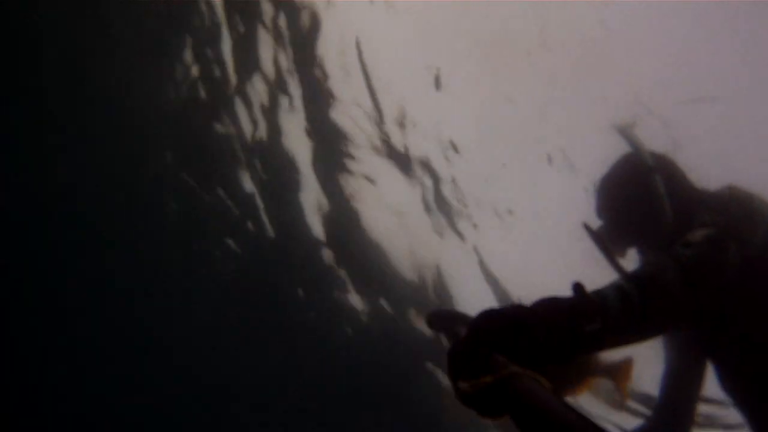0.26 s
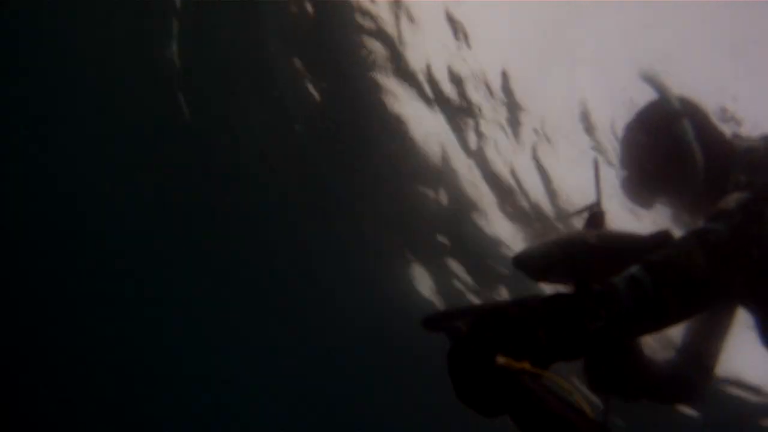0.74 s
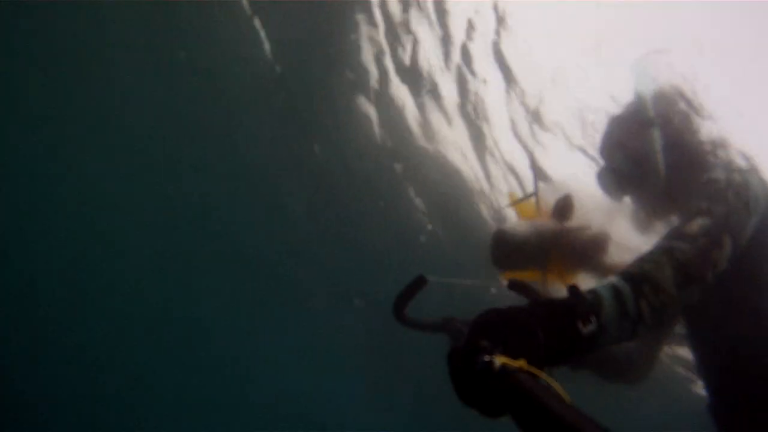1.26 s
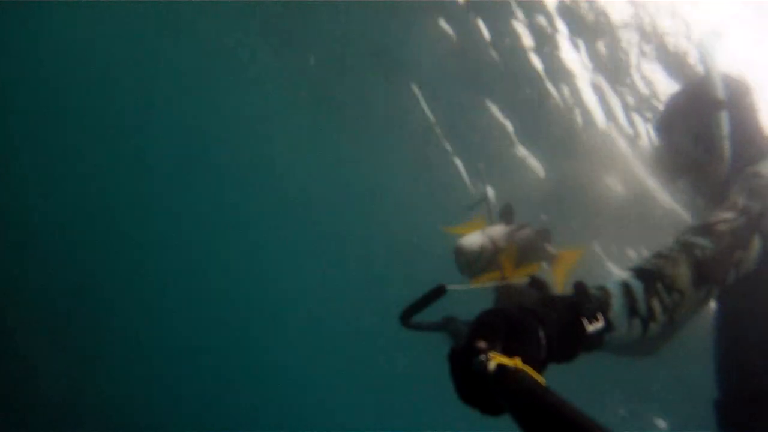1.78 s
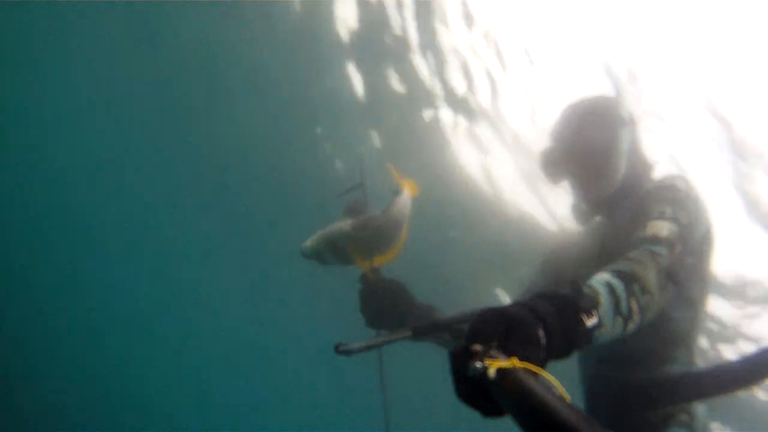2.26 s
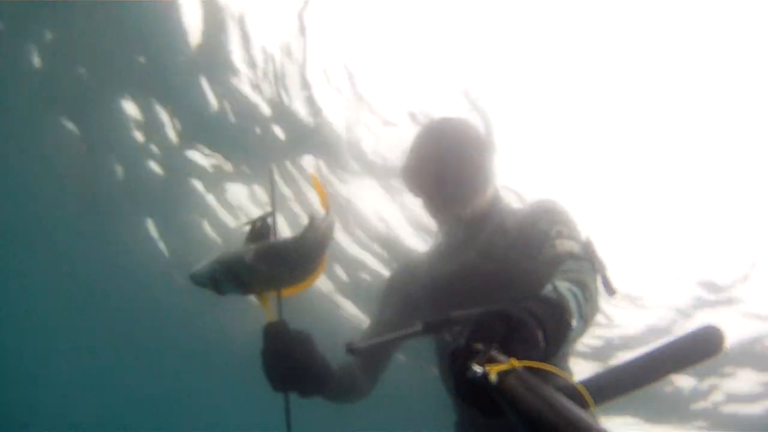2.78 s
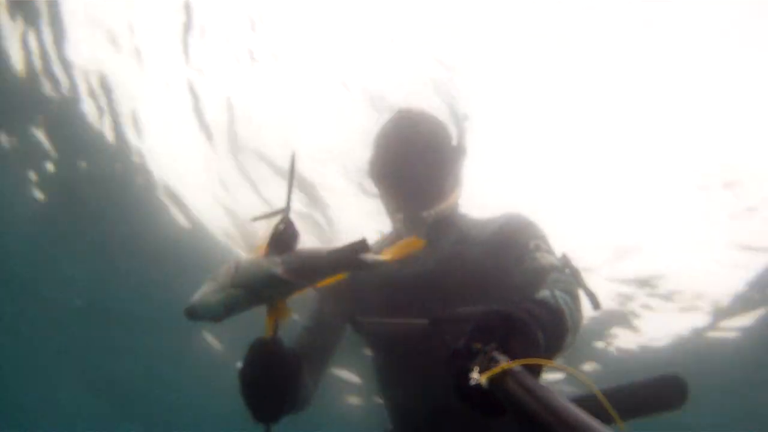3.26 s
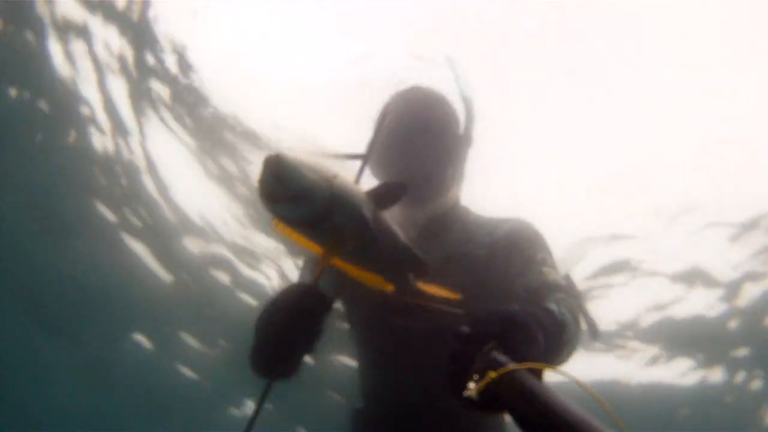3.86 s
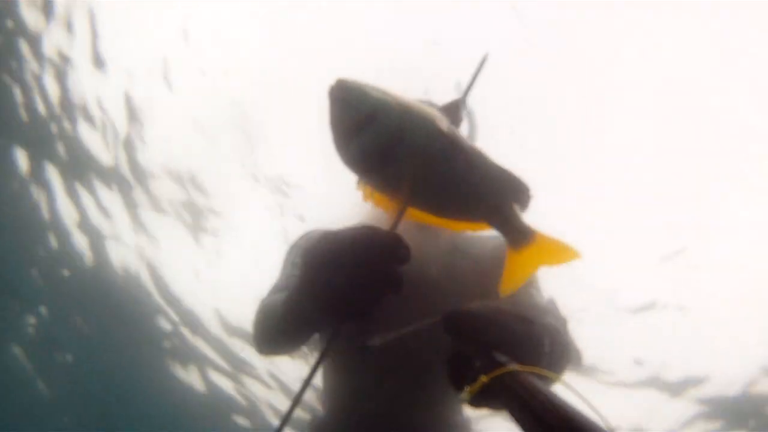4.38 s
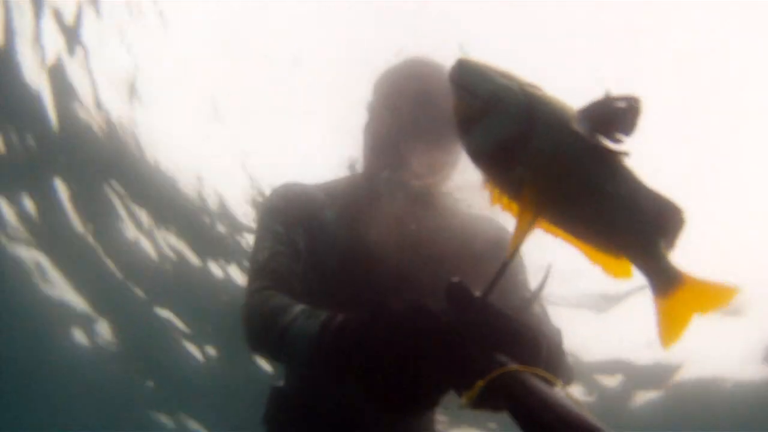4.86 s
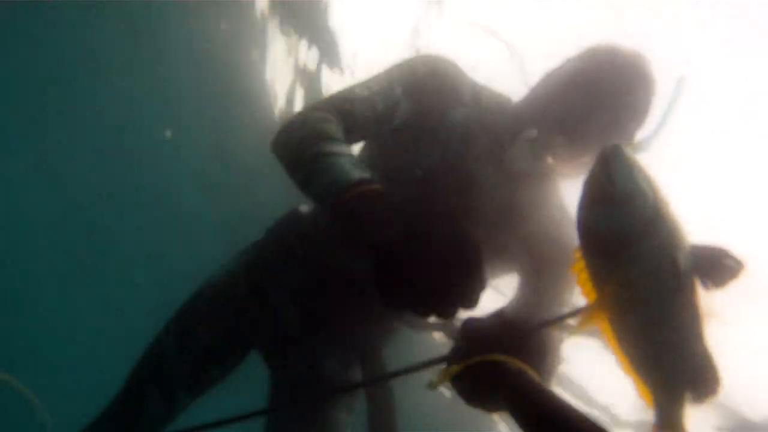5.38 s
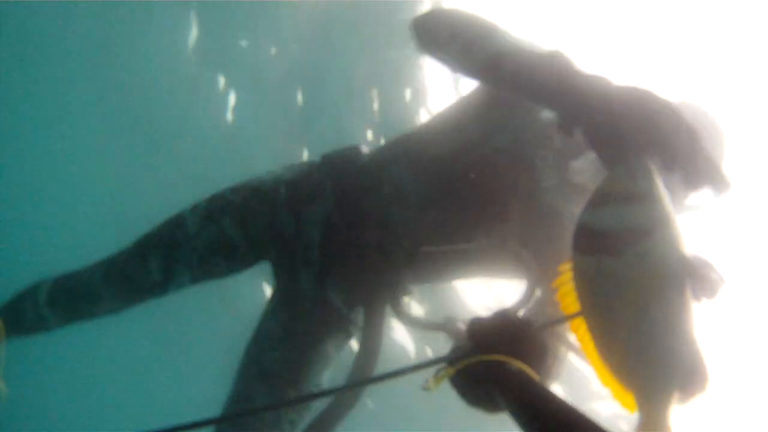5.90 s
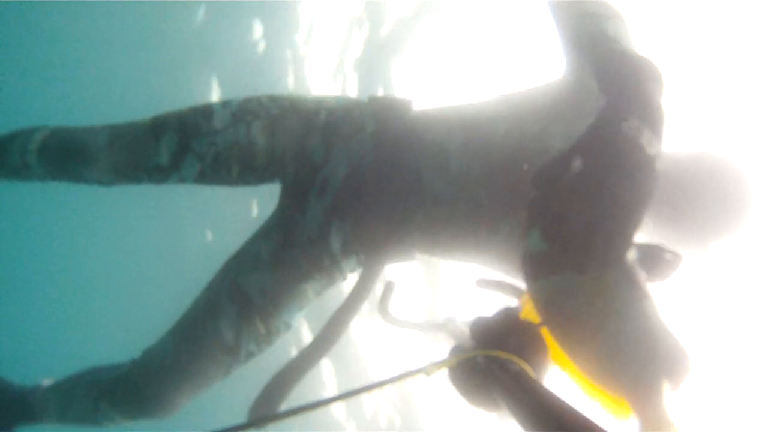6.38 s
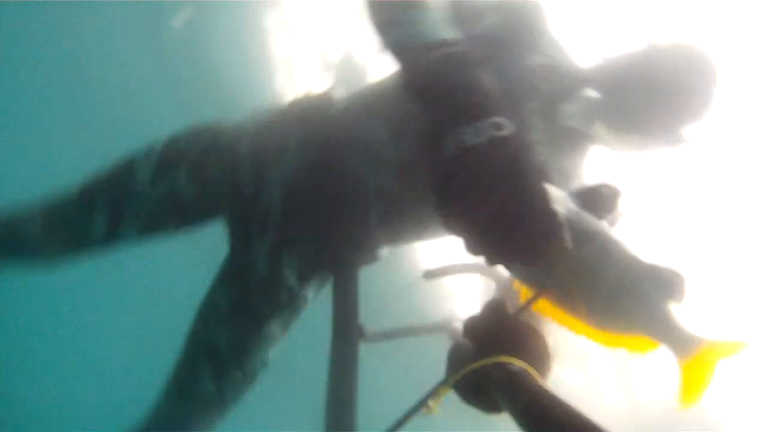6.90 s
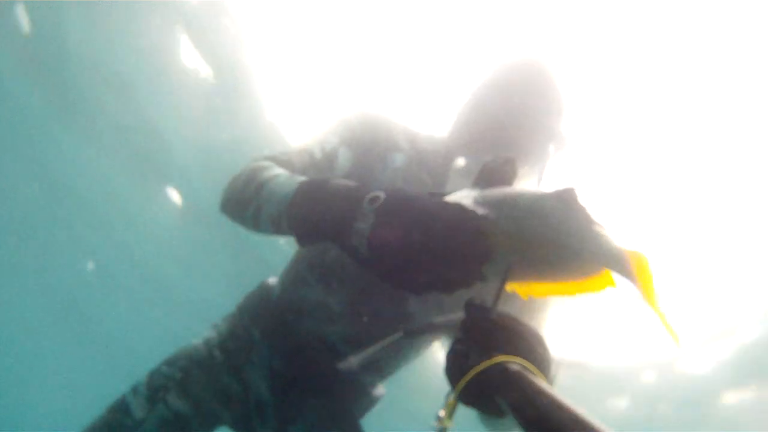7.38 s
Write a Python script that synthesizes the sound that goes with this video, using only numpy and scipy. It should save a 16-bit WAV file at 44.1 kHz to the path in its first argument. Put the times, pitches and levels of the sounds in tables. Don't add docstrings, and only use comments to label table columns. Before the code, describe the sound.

Underwater on a reef, heard from inside a sealed case fixed to a hollow tube. Sharp shrimp snaps tick irregularly throughout over a dense faint crackle and steady soft water noise. At the very start a short rising squeak and a falling one slip out as a line scrapes the tube until about 0.9 seconds. A low bubbly thump comes at 0.3, a flick at 0.57, then a ringing strike and deep bump around 0.83. From 1 to 3.3 it is mostly clicks, with a low surge at 2.3. Quick hollow knocks cluster from 3.4 to 3.75, with scraping; a deep shove follows near 4.15. The loudest clank lands at 5.2 with a burst of rubbing and humming. Clicks and small taps continue, dull rubbing at 6.1 and 6.75, sharp knocks at 7.1, low thuds from 7.2, and a final scrape and bump around 7.6. Close, boxy, with gritty treble.

```python
import sys
import numpy as np
from scipy import signal
from scipy.fft import rfft, irfft, next_fast_len
from scipy.io import wavfile
from scipy.ndimage import uniform_filter1d, map_coordinates

SR = 44100
rng = np.random.default_rng(int(sys.argv[2]) if len(sys.argv) > 2 else 0)


def voltage_ratio(decibels):
    exponent = np.asarray(decibels, float) / 20
    return 10 ** exponent


def to_wav(s):
    ch = np.atleast_2d(s).T
    pcm = np.round(np.clip(ch, -1, 1) * 32767)
    wavfile.write(sys.argv[1], SR, pcm.astype(np.int16))


N = 336924


def unit(x):
    return x / np.sqrt(np.mean(x ** 2) + 1e-20)


def curves(rows):
    s, *columns = np.transpose(rows)
    return [np.interp(np.arange(N) / SR, s, column) for column in columns]


def wobble(rate):
    points = rng.standard_normal(int(N * rate / SR) + 4)
    return map_coordinates(points, [np.arange(N) * rate / SR])


def smooth(slow):
    return np.interp(np.arange(N) / SR, np.arange(len(slow)) / 1000, slow)


def filtered(x, response):
    size = next_fast_len(N + SR // 2)
    hz = np.fft.rfftfreq(size, 1 / SR)
    return irfft(rfft(x, size) * response(hz), size)[..., :N]


def resonances(modes):
    def response(f):
        total = 0
        for k, (hz, width, db) in enumerate(modes):
            mode = 1j * f * width / (hz * hz - f * f + 1j * f * width)
            total = total + (-1) ** k * voltage_ratio(db) * mode
        return total
    return response


def noise(points):
    hz, db = np.transpose(points)

    def spectrum(f):
        return voltage_ratio(np.interp(np.log(f + 1), np.log(hz), db, -120, -120))
    return unit(filtered(rng.standard_normal(N), spectrum))


def scatter(times, rows):
    at = np.round(np.asarray(times) * SR).astype(int)[:, None] + np.arange(rows.shape[1])
    return np.bincount(at.ravel(), rows.ravel(), N + SR)[:N]


# (frequency [Hz], width [Hz], level [dB])
DULL = [(600, 103, 0.5), (1204, 343, 3), (1837, 315, 6.5)]
MIDDLE = [(2330, 278, 8.6), (2686, 303, 7), (3347, 124, 0.25)]
BRIGHT = [(4063, 1080, 5), (5310, 200, -12.5)]


def snaps(times, db, dull_db, bright_db, burst_s, tail_s, tail_db, direct):
    t = np.arange(SR // 40) / SR
    length = burst_s * np.exp(0.35 * rng.standard_normal((len(times), 1)))
    chance = rng.standard_normal((2, len(times), len(t)))
    early = np.exp(-(1.23 * t / length) ** 1.28) * chance[0] ** 3 / 4
    tail = voltage_ratio(tail_db - 60 * t / tail_s) * chance[1]
    echoes = early + tail
    echoes /= np.linalg.norm(echoes, axis=1, keepdims=True)
    burst = echoes - direct * (t == 0)
    ring = 0
    for wall, level in [(DULL, db + dull_db), (MIDDLE, db), (BRIGHT, db + bright_db)]:
        ring = ring + filtered(scatter(times, voltage_ratio(level)[:, None] * burst), resonances(wall))
    crack = scatter(times, direct * voltage_ratio(db - 0.5 + dull_db / 3)[:, None])
    through = resonances([(2280, 2340, 0)])
    return ring + filtered(crack, lambda f: through(f) ** 2)


# (time [s], peak level [dB], dull part [dB], bright part [dB])
SNAPS = [(0.0049, -22.5, -7, -7.5), (0.225, -19.5, -33, -16), (0.379, -25.5, -1, -1.5),
         (0.5733, -26, 2, -15), (1.025, -23, -1, 5), (1.3116, -19, -3, -4), (1.7504, -24.5, -16, -0.5),
         (1.879, -17, -2.5, -1), (2.3324, -22, 3.5, -7.5), (2.6587, -25, -5.5, -6.5),
         (2.7733, -24, -4.5, -2.5), (3.4024, -20.5, -5, -8), (3.4425, -22, -8, -11),
         (3.748, -19.5, -4.5, -6), (4.0385, -26.5, 4.5, -3.5), (4.212, -22.5, -30, -8),
         (4.2308, -24, 5.5, -5), (4.3675, -34.5, 10, 6.5), (4.8609, -23, -38, -1), (4.933, -25, -14, -24),
         (5.1115, -22, 1.5, -1), (5.2908, -22, 4, -1), (5.4625, -18.5, -6.5, -14), (5.7779, -29.5, 7.5, -4),
         (6.1953, -28.5, 9.5, 2), (6.5317, -26.5, -1, -17), (6.643, -24.5, 1, -12.5), (7.0034, -22, -2, -1),
         (7.0849, -43, 20, 4), (7.3271, -39, 12.5, 5)]
# (time [s], peak level [dB])
THIN = [(0.2634, -30), (0.314, -25), (0.3504, -28.5), (.617, -31.5), (0.97, -30), (1.1563, -34),
        (1.7104, -27.5), (2.0112, -29), (2.094, -29), (2.236, -29.5), (2.5174, -30.5), (2.527, -31),
        (2.7234, -27.5), (2.8975, -30.5), (2.929, -31), (3.269, -32.5), (3.68, -27.5), (3.7144, -26.5),
        (3.8233, -25.5), (4.077, -28.5), (5.263, -30), (5.562, -27), (6.03, -28.5), (6.0753, -27.5),
        (6.1762, -29), (6.499, -30.5), (6.7058, -29), (7.1893, -25), (7.217, -29.5), (7.2841, -29)]
# (time [s], peak level [dB])
FULL = [(.064, -30), (0.4352, -27.5), (1.731, -26), (1.7924, -25), (1.84, -30.5), (1.903, -31),
        (2.1873, -34), (3.318, -31.5), (3.52, -29.5), (3.5292, -28.5), (3.942, -30.5), (4.526, -26.5),
        (4.7027, -30), (4.7915, -27), (4.9752, -31), (5.2165, -26), (5.14, -31.5), (5.1926, -27),
        (5.3143, -28), (5.4731, -30.5), (5.856, -28.5), (5.8785, -31.5), (6.349, -25), (6.4609, -23.5),
        (6.5192, -26), (6.6086, -28), (6.936, -25), (7.066, -31), (7.137, -31), (7.301, -30.5)]
# (time [s], peak level [dB])
FAINT = [(0.4092, -34), (0.73, -38), (0.868, -30.5), (1.0013, -33), (1.0684, -33), (1.2079, -32.5),
         (1.2728, -37), (1.609, -33), (1.637, -32), (1.7723, -32), (1.914, -38), (2.196, -30.5), (2.4, -40),
         (2.948, -35.5), (3.1927, -32), (3.254, -32.5), (4.3037, -29), (4.3347, -35.5), (4.448, -34),
         (4.501, -32.5), (4.628, -41), (5.06, -32.5), (5.184, -32), (5.4044, -36), (5.6657, -40),
         (5.838, -33), (5.937, -32), (1.897, -37), (6.69, -35), (7.52, -39)]


def shrimp():
    thin = [(s, db, -9, -2) for s, db in THIN]
    full = [(s, db, -4.5, -3) for s, db in FULL]
    s, db, dull_db, bright_db = np.transpose(SNAPS + thin + full)
    near = snaps(s + 0.00042, db + 18.5, dull_db, bright_db + 0.5,
                 burst_s=0.0019, tail_s=0.043, tail_db=-14, direct=0.93)

    strays, stray_db = 70, -43
    stray = rng.random((strays, 2)) * [N / SR, 6] + [0, stray_db - 7.5]
    s, db = np.transpose(FAINT + list(stray))
    colour = rng.standard_normal((len(s), 2))
    faint = snaps(s + 0.00039, db + 21.0, -6 + 3 * colour[:, 0], -3 + 3 * colour[:, 1],
                  burst_s=0.0011, tail_s=0.062, tail_db=-14.5, direct=0.63)

    far_count, reef_db = 1300, -50
    draw = rng.random((far_count, 2))
    colour = rng.standard_normal((far_count, 2))
    size_db = np.minimum(-4.2 * np.log(draw[:, 1]), 8)
    far = snaps(draw[:, 0] * N / SR, size_db, -7 + 6 * colour[:, 0], -4 + 6 * colour[:, 1],
                burst_s=0.002, tail_s=0.05, tail_db=-20, direct=0.7)
    return near + faint + voltage_ratio(reef_db) * unit(far)


# (start time [s], length [s], level [dB], brightness [dB])
STROKES = [(0, 0.68, -61.5, 0), (0.628, 0.35, -58.5, -2), (3.394, 0.23, -59, 3), (3.898, 0.38, -57, -6),
           (5.06, 0.19, -54, -17), (5.233, 0.13, -41.5, -9), (5.35, 0.34, -60, -20),
           (5.913, 0.14, -60.5, -1), (6.055, 0.26, -53.5, -16), (6.704, 0.276, -55, -30),
           (6.757, 0.2, -48.5, -24), (7.399, 0.14, -45, -1), (7.45, 0.13, -46, -12),
           (7.579, 0.05, -41, -25)]


def rubbing():
    edge_s, resting_db = 0.031, -60
    s, length, level_db, bright_db = np.transpose(STROKES)[:, :, None]
    t = np.arange(8000) / 1000 - s
    shape = np.clip(np.minimum(t, length - t) / edge_s + 0.5, 0, 1) ** 2
    grit = rng.standard_normal((2, N)) * voltage_ratio(2.2 * wobble(70))
    wander = uniform_filter1d(grit, size=900, axis=1)
    wander = uniform_filter1d(wander, size=900, axis=1)
    grip = voltage_ratio(2.1 * unit(wander))
    grit = grit * grip[::-1]
    # (Hz, width Hz, dB)
    low_modes = [(446, 71, -3.5), (594.6, 45.0, 1.0), (669, 112, -9.0), (900, 168, -6.0)]
    high_modes = [(1290, 230, -8.5), (1450, 60, -26.0), (1690, 120, -5.5), (2050, 330, 0.0)]
    low = unit(filtered(grit[0], resonances(low_modes)))
    high = unit(filtered(grit[1], resonances(high_modes)))
    stroke = voltage_ratio(level_db) * shape
    low_gain = voltage_ratio(resting_db) + smooth(stroke.sum(axis=0))
    high_gain = voltage_ratio(resting_db - 14) + smooth(np.sum(stroke * voltage_ratio(bright_db), axis=0))
    return low_gain * low + high_gain * high


def shoved(calm_db, crest_s, crest_db, fall_db_s):
    rise_db_s = 334
    t = np.arange(8000) / 1000 - crest_s[:, None]
    slope_db = np.minimum(rise_db_s * t, -fall_db_s * t)
    return voltage_ratio(calm_db) + smooth(voltage_ratio(crest_db[:, None] + slope_db).sum(axis=0))


# (frequency [Hz], level [dB per Hz])
HEAVE = [(12, -35), (26, 7.5), (34, -6.5), (43, -12), (54, 3.5), (70, -44)]
SLOSH = [(40, -68), (58, -33), (75, 6.5), (105, -8), (135, -9.5), (170, -47)]
GURGLE = [(100, -58), (150, -5), (240, -5), (350, -7), (450, -22.5)]
SEA = [(59, -59), (100, 4), (414, -13), (584, -33), (693, -19), (1080, -23.5), (1720, -10.5), (2070, -14),
       (2380, -5.5), (3530, -14.5), (4190, -11), (5140, -15), (6000, -14.5), (7800, -65), (13200, -120)]
# (time [s], effort [dB])
EFFORT = [(0, -35), (.21, -34), (.4, -39), (.76, -33.5), (1.04, -39.5), (1.34, -49), (2.23, -48.5),
          (2.6, -54.5), (3.19, -50), (3.49, -56.5), (4.1, -50), (5.15, -52.5), (6.02, -45), (6.38, -59),
          (6.94, -42), (7.15, -44.5), (7.3, -39), (7.64, -50)]
# (time of crest [s], heave [dB], slosh [dB], gulp [dB])
SHOVES = [(.2, -58, -37, -50), (.3, -33.5, -41, -42), (.54, -57, -44, -53), (0.851, -25, -26.5, -51),
          (1.04, -40, -50, -60), (2.05, -56, -53, -60), (2.339, -35, -46, -58.5), (3.4, -68, -68, -53),
          (3.54, -68, -72, -49), (3.64, -44, -44.5, -68), (3.82, -59, -55, -75), (4.15, -27, -40.5, -57),
          (4.5, -48, -53.5, -69), (5.25, -31.5, -33.5, -50), (6.3, -74, -43, -62), (6.55, -42, -42.5, -55),
          (6.64, -66, -62, -78), (6.85, -47, -51, -52.5), (7.248, -33.5, -33.5, -48), (7.36, -40, -40, -64),
          (7.6, -35, -40, -44.5)]


def water():
    effort_db, = curves(EFFORT)
    crest_s, heave_db, slosh_db, gulp_db = np.transpose(SHOVES)
    lump = np.tanh(wobble(14))
    heave = shoved(effort_db, crest_s, heave_db, fall_db_s=90)
    heave = heave * voltage_ratio(3 * lump) * noise(HEAVE)
    slosh = shoved(effort_db - 11.5, crest_s, slosh_db, fall_db_s=130)
    slosh = slosh * voltage_ratio(3.5 * lump) * noise(SLOSH)
    calm_db = -63 + 0.075 * (effort_db - effort_db.mean())
    gurgle = shoved(calm_db, crest_s, gulp_db, fall_db_s=152)
    gurgle = gurgle * voltage_ratio(2.4 * lump + 2.9 * wobble(25)) * noise(GURGLE)
    sea = voltage_ratio(-53.0 + 2.35 * wobble(30)) * noise(SEA)
    return heave + slosh + gurgle + sea


# (time [s], peak level [dB], pitch [Hz], swell time [s])
TONES = [(.0045, -36, 1560, 0.00081), (.005, -30, 3310, 0.00091), (.573, -32.5, 1560, 0.001),
         (1.025, -41, 600, 0.0027), (3.4029, -17, 1630, 0.00054), (3.4029, -31, 3120, .0012),
         (3.4808, -33.5, 1280, 0.0023), (3.497, -41, 374, .005), (3.514, -36, 297, 0.0055),
         (3.5706, -37, 253, 0.0039), (3.571, -24.5, 450, 0.0028), (3.667, -35, 1840, 0.0018),
         (3.687, -20, 933, 0.0017), (3.6905, -22, 556, 0.0022), (3.7045, -22.5, 900, 0.0014),
         (3.7, -39, 700, .0012), (3.732, -43, 704, .0015), (3.736, -43, 450, .003),
         (3.719, -32, 850, 0.002), (4.0375, -26, 1690, 0.0011), (4.0487, -38, 4100, .001),
         (4.231, -22.5, 1950, 0.0008), (4.232, -29, 3000, 0.002), (4.231, -30.5, 3950, 0.0011),
         (4.232, -35, 1030, 0.0012), (.818, -37.5, 1690, 0.0036), (4.933, -34.5, 1000, 0.0016),
         (5.1115, -26, 2620, 0.00094), (5.1116, -30, 1720, 0.00091), (5.111, -36, 1060, 0.00064),
         (5.113, -28, 3250, 0.0013), (5.1213, -31, 4040, 0.00078), (5.216, -27, 3280, 0.0014),
         (5.215, -21.5, 2780, .0008), (5.2153, -18, 900, 0.0012), (5.221, -34, 2610, 0.003),
         (5.4621, -16.5, 1860, 0.00086), (5.215, -16, 1460, 0.0018), (5.216, -31, 2170, .0016),
         (5.7781, -18.5, 2350, 0.0011), (5.783, -29, 1970, 0.0012), (5.776, -41, 1000, 0.0031),
         (5.462, -33.5, 900, 0.0015), (6.1955, -14.5, 1780, 0.00077), (6.1953, -21.5, 2840, 0.001),
         (7.326, -40, 1000, 0.0012),
         (.28, -32, 253, 0.0063), (0.28, -29.5, 177, 0.0071), (.52, -39, 226, 0.008),
           (5.24, -34.5, 553, .028), (2.303, -33.5, 144, 0.0026), (5.225, -39, 194.4, 0.0313),
           (5.275, -41, 1290, 0.02), (5.27, -42.5, 1470, 0.021), (5.27, -44, 890, 0.025),
           (6.7, -32, 105, .008), (.052, -43, 650, 0.0024)]


def panels():
    t = np.arange(SR // 5) / SR
    s, db, hz, swell_s = np.transpose(TONES)[:, :, None]
    u = t / swell_s
    return scatter(s[:, 0], voltage_ratio(db) * u * np.exp(1 - u) * np.sin(2 * np.pi * hz * t))


# (time [s], pitch [Hz], level [dB])
SQUEAKS = [
    [(.006, 2460, -45), (.011, 2480, -33), (.02, 2540, -35), (.027, 2650, -34), (.031, 2650, -74)],
    [(.03, 2150, -37), (.033, 2030, -35), (.038, 1850, -40), (.045, 1650, -29.5), (.05, 1350, -34),
     (.055, 1290, -32), (.06, 1410, -38.5)],
]


def squeaks():
    out = np.zeros(N)
    for rows in SQUEAKS:
        hz, db = curves(rows)
        phase = 2 * np.pi * np.cumsum(hz * (1 + 0.02 * wobble(408))) / SR
        sounding = (db > db[-1]) * (np.arange(N) > rows[0][0] * SR)
        overtone = voltage_ratio(-9) * np.clip(hz / 500 - 2.4, 0, 1) * (hz < 1850)
        tone = np.sin(phase) + overtone * np.sin(2 * phase)
        out += voltage_ratio(db + 3.5 * wobble(350)) * sounding * tone
    return out


# (time [s], level [dB])
MUFFLED = [(0.2627, -45), (0.2731, -40), (0.2981, -44), (0.4207, -39), (0.4357, -44), (0.5403, -44),
           (0.617, -38.5), (0.711, -49), (0.7797, -53), (0.8063, -54), (1.1, -44), (1.2007, -38),
           (1.2071, -44), (1.2725, -47), (1.5828, -45.0), (1.6476, -36), (1.9344, -38.5), (2.3157, -44.0),
           (2.4003, -42.5), (2.517, -46), (2.9476, -40), (3.0623, -41), (3.129, -43), (3.2708, -39.5),
           (3.4425, -38), (3.575, -41), (3.6671, -38), (3.7725, -42), (3.9273, -41), (3.9678, -46),
           (4.086, -43), (4.1335, -36), (4.1491, -48), (4.2875, -45), (4.6283, -37), (4.7029, -37),
           (4.9522, -42), (4.9731, -38), (5.0595, -38.5), (5.1566, -37.5), (5.4972, -42), (5.551, -35),
           (5.6559, -46), (5.895, -49), (5.9018, -43.5), (6.03, -46), (6.1328, -46), (6.2218, -46.0),
           (6.2537, -42), (6.3981, -41), (6.5628, -47), (6.783, -46.5), (6.8472, -39), (7.065, -37),
           (7.132, -41), (7.237, -44), (7.3048, -42), (7.3437, -43.0), (7.411, -43), (7.6167, -52)]
# (time [s], level [dB])
CRISP = [(0.3299, -37), (0.7108, -37), (0.7308, -38.5), (0.781, -34), (0.8053, -38), (1.046, -31.5),
         (1.2726, -40), (1.3265, -41), (1.479, -37), (1.4985, -41), (1.542, -39.5), (1.5682, -37.5),
         (1.827, -36.5), (1.922, -40), (2.0336, -34.5), (2.084, -37), (2.261, -37), (2.3075, -47),
         (2.3573, -39), (2.5008, -38), (2.5386, -35), (2.602, -37), (2.8974, -44), (3.0602, -46),
         (3.16, -34.5), (3.2048, -34.5), (3.3683, -35.5), (3.5913, -38), (3.919, -38.5), (4.086, -36),
         (4.1476, -38), (4.3357, -41), (4.4869, -40), (4.643, -44), (4.7476, -37.5), (4.803, -38),
         (4.9527, -47), (5.033, -38), (5.0694, -42.0), (5.1214, -37), (5.2529, -38), (0.032, -29),
         (5.514, -37.5), (5.6661, -40.5), (5.794, -36.5), (5.8904, -34.5), (5.909, -36.5), (6.1224, -37),
         (6.1406, -36.5), (6.2612, -40), (6.674, -42), (3.6885, -40), (7.0, -33), (7.2308, -38),
         (7.246, -37), (7.356, -36.5), (7.4143, -39.5), (7.5275, -37)]


def distant():
    s, db = np.transpose(MUFFLED)
    muffled = snaps(s, db + 19, 8.3, -2.8, burst_s=0.002, tail_s=0.048, tail_db=-17, direct=0.33)
    s, db = np.transpose(CRISP)
    crisp = snaps(s, db + 22.0, -8.5, -1.4, burst_s=0.0017, tail_s=0.056, tail_db=-13.5, direct=0.84)
    return muffled + crisp


# (frequency [Hz], level [dB], time to fade by 60 dB [s])
BARREL = [(225, -25, .08), (360, -8, .085), (465, -18, .06), (551, 0, .11), (640, -13, .25), (706, -8, .2),
          (870, -11, .11), (983, -2, .05), (1265, -16, .07), (1484, -11, .07), (1675, -16, .07),
          (2110, -12, .03), (2600, -14, .035), (3240, -15, .025)]
# (time [s], peak level [dB], brightest pitch [Hz], share of full ring time)
FLICKS = [
    (.062, -37, 720, 0.19),
    (.572, -26.5, 695, 0.17),
    (2.195, -40, 1050, 0.49),
    (4.589, -36, 1090, 0.3),
]
# (time [s], peak level [dB], brightest pitch [Hz], share of full ring time)
STRIKES = [
    (.817, -27.5, 1180, 0.94),
    (4.229, -40, 600, 0.47),
    (4.934, -33.5, 760, 0.25),
    (5.216, -5.5, 900, 0.93),
    (6.531, -42, 470, 0.74),
    (7.592, -33, 400, 0.37),
]
# (time [s], peak level [dB], brightest pitch [Hz], share of full ring time)
BUMPS = [(.842, -22.5, 211, 0.88), (.862, -39, 700, 0.16), (.888, -36.5, 617, 0.27), (.996, -41, 210, 0.81),
         (3.4802, -22.5, 570, 0.17), (3.4803, -21, 1140, 0.091), (3.5715, -22, 423, 0.19),
         (3.6875, -25, 900, 0.08), (3.688, -19, 338, 0.07), (3.693, -22, 600, 0.12), (3.705, -29, 800, 0.2),
         (3.708, -21, 536, 0.18), (3.719, -33, 900, 0.15), (3.7225, -24, 534, 0.13), (4.05, -44, 580, 0.46),
         (4.13, -26, 570, 0.3), (5.462, -32.5, 600, 0.37), (5.778, -29, 550, 0.27),
         (6.194, -27.5, 590, 0.097), (7.0853, -21.5, 1040, 0.08), (7.0856, -16.5, 1470, 0.043),
         (7.088, -32.5, 560, 0.37), (7.214, -28.5, 417, 0.35), (7.226, -25, 227, 0.24),
         (7.348, -40, 500, 0.24), (7.576, -27.5, 525, 0.34)]


def knocks():
    t = np.arange(SR // 3) / SR
    hz, level, t60 = np.transpose(BARREL)[:, :, None]
    kinds = [(STRIKES, 0.5), (BUMPS, 52.5), (FLICKS, 66)]
    times, rows = [], []
    for table, softness in kinds:
        onset = (1 - np.exp(-t / (0.00051 + 0.00001 * softness))) ** 2
        for s, db, centre_hz, share in table:
            chance = 1.2 * rng.standard_normal((len(hz), 1))
            evenness = min(share + 0.63, 1)
            strength = evenness * level - softness * np.log2(hz / centre_hz) ** 2 + chance
            modes = voltage_ratio(strength - 60 * t / (t60 * share)) * np.sin(2 * np.pi * hz * t)
            ring = np.sum(modes, axis=0) * onset
            times.append(s)
            rows.append(voltage_ratio(db) * ring / np.abs(ring).max())
    return scatter(times, np.array(rows))


# (time [s], peak level [dB], swing frequency [Hz], time to fade by 60 dB [s])
JOLTS = [(.236, -33, 274.5, 0.2), (0.269, -19.5, 54, 0.15), (0.294, -24, 160, 0.18), (0.654, -25.5, 39, 1),
         (.828, -18.5, 454, 0.066), (0.835, -14, 49, 0.14), (0.916, -37, 218, 0.17),
         (1.003, -20, 47.1, 0.51), (2.325, -25.5, 43, 0.19), (3.458, -37, 290, 0.12),
         (3.589, -34.5, 92.4, 0.35), (3.614, -35, 60, 0.22), (4.1417, -18, 33.7, 0.22),
         (5.219, -25, 68.6, 0.33), (7.233, -31, 58, 0.27), (7.29, -36, 36.8, 0.74), (7.267, -31, 66, .3),
         (7.345, -41, 235, .08), (7.361, -26, 54.6, .25), (7.589, -28, 64, 0.18)]


def jolts():
    t = np.arange(SR // 2) / SR
    s, db, hz, t60 = np.transpose(JOLTS)[:, :, None]
    turns = hz * (t + 0.0014 * (1 - np.exp(-t / 0.0074)))
    onset = 1 - np.exp(-t / 0.0038)
    return scatter(s[:, 0], voltage_ratio(db + 2.0 - 60 * t / t60) * np.sin(2 * np.pi * turns) * onset)


def scene():
    reef = shrimp() + distant()
    gun = rubbing() + knocks() + jolts()
    return (reef + gun + water() + panels() + squeaks())[None]


def top_cut(x):
    return signal.sosfilt(signal.butter(12, 16620, fs=SR, output="sos"), x)


def record(dry):
    sample_hz, out_hz = 12000, 48000

    def port(f):
        dip = 1 - 0.8 / (1 + ((f - 4620) / 170) ** 2)
        return dip * (f < sample_hz / 2) / (1 + (f / 5600) ** 24)
    band = filtered(dry, port)
    mirrored = band * (1 + 2 * np.cos(2 * np.pi * sample_hz * np.arange(N) / SR))
    held = filtered(mirrored, lambda f: np.sinc(f / sample_hz) / np.sinc(f / out_hz))

    body = filtered(held, lambda f: f <= 15290)
    top = filtered(held, lambda f: (f > 15290) * (f <= 15860) * voltage_ratio(-9))
    edge = filtered(held, lambda f: (f > 15860) * voltage_ratio(np.interp(f, [15860, 16550, 16680], [-15, -20, -60])))
    loudness = uniform_filter1d(top ** 2, size=1024)
    passes = uniform_filter1d(1. * (loudness > np.quantile(loudness, 0.42)), size=256)
    peaks = uniform_filter1d(1. * (loudness > np.quantile(loudness, 0.93)), size=256)
    return top_cut(body + passes * top + peaks * edge)


dry = scene()
out = record(dry)
to_wav(out)
```